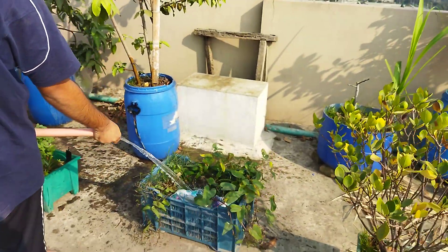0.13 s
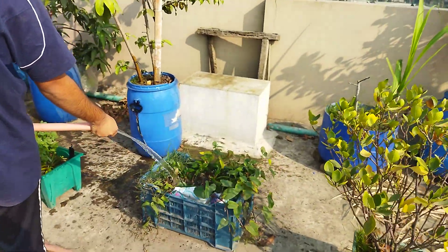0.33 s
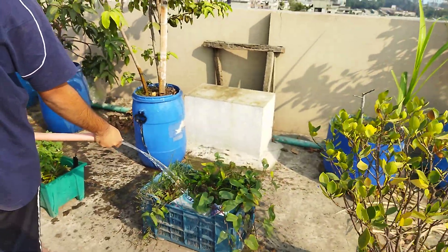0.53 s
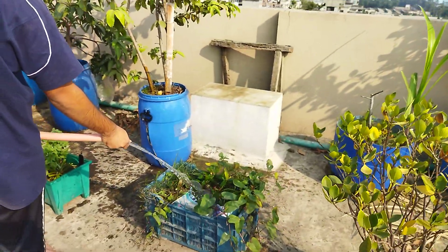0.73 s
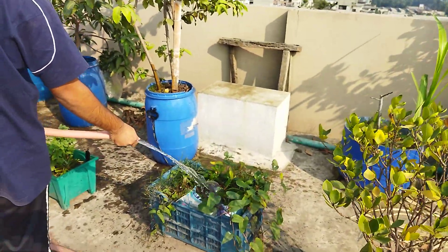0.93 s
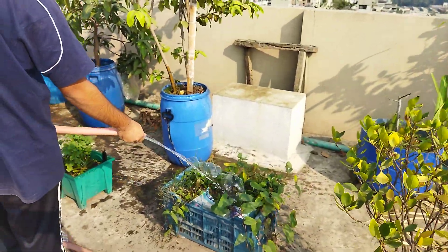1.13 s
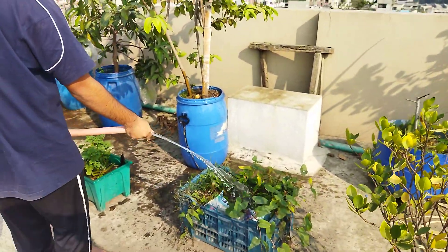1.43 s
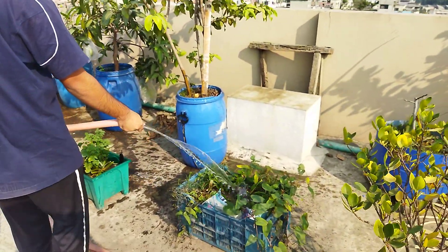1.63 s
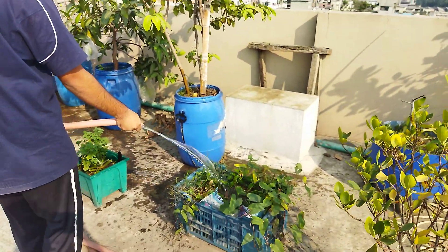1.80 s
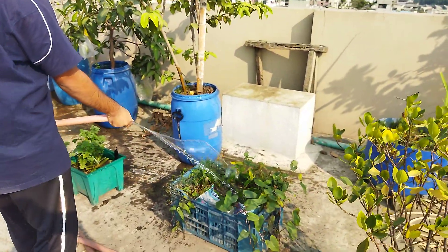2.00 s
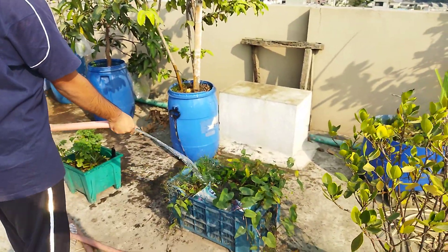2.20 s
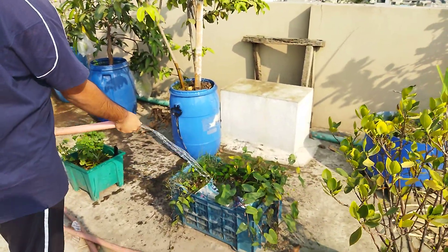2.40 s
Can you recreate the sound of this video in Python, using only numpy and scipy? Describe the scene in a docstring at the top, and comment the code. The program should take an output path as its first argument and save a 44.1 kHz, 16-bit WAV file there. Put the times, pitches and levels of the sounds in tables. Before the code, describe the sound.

A hose stream splatters on soaked soil and ticks on leaves outdoors, growing slightly stronger halfway, with small puddle plops and a late sharp drip. Wind thumps unevenly on the nearby microphone over faint foot scuffs and distant town noise.

```python
"""Water from a garden hose pours into a crate of leafy plants on a roof terrace.
Droplets tick and slap on the leaves, the stream splatters on wet soil, bubbles ring in a puddle,
and one heavy drop smacks the floor. Feet scuff on concrete; the parapet walls answer briefly.
Wind eddies hit the two microphone ports separately, over a faint wash of town noise."""
import sys
import numpy as np
from scipy import signal
from scipy.fft import rfft, irfft, next_fast_len
from scipy.io import wavfile
from scipy.ndimage import uniform_filter1d, map_coordinates

SR = 44100
rng = np.random.default_rng(int(sys.argv[2]) if len(sys.argv) > 2 else 0)


def store_pcm(level_fs):
    """Save levels as 16-bit WAV."""
    pcm = np.round(np.clip(level_fs, -1, 1) * 32767).astype(np.int16)
    wavfile.write(sys.argv[1], SR, np.atleast_2d(pcm).T)


N = 112454
PORT_LAG_S, WALL_DB, WALL_T60_S = 0.00008, 2.5, 0.14


# start_s, level_db
SPRAY_LEVEL = [(0, -51), (.2, -51), (.38, -51.5), (.62, -52.5), (1.0, -52.5), (1.17, -51), (1.28, -49.5),
               (1.42, -48), (1.62, -51), (1.73, -47), (1.82, -52), (1.86, -47.5), (2.14, -49.5),
               (2.24, -52.5), (2.55, -50.5)]
# freq_hz, gain_db
LEAF_SPECTRUM = [(1000, -6), (4400, 1.5), (5200, -1), (6700, -4.5), (7500, -7), (9700, -0.5), (11300, -4.5),
                 (11900, 2), (15800, -4.5)]
def spray(gain_db=4, mist_db=1.5):
    """Droplets tick on the leaves in uneven clumps over a fine mist."""
    ticks = impacts(per_s=3600, spread_db=3.1) * amp(2.9 * wobble(170))
    ticks = unit(terrace(ticks, lag_s=PORT_LAG_S))
    mist = amp(mist_db) * rng.standard_normal((2, N))
    return unit(coloured(ticks + mist, LEAF_SPECTRUM)) * amp(curve(SPRAY_LEVEL) + gain_db)


# start_s, level_db
LEAF_SLAPS = [(0.064, -31), (0.273, -22), (.776, -32), (1.160, -29), (1.401, -17.5), (1.537, -21.5),
              (1.838, -28), (1.85, -20), (1.977, -22), (2.088, -20), (2.128, -21), (2.196, -24),
              (2.265, -26), (2.489, -26), (2.507, -17.5)]
# freq_hz, gain_db
SLAP_SPECTRUM = [(1500, -13), (4000, -4), (7500, -14), (10000, -3.5), (12500, 2.5), (15500, 1)]
def slaps(gain_db=-10):
    """Big drops burst on near leaves, each a short, bright splash."""
    envelope = sum(amp(db + gain_db) * decay(s, t60_s=0.012) for s, db in LEAF_SLAPS)
    bursts = coloured(envelope * rng.standard_normal(N), SLAP_SPECTRUM)
    return terrace(bursts, wall_db=-2, lag_s=PORT_LAG_S)


# start_s, level_db
STREAM_LEVEL = [(0, -43.5), (.11, -47), (.33, -45.5), (.55, -43.5), (.63, -44.5), (.86, -42.5), (1.08, -44),
                (1.25, -40), (1.5, -41), (1.75, -40.5), (2.15, -40.5), (2.3, -41.5), (2.55, -40)]
# centre_s, sigma_s, level_db
STREAM_SURGES = [(0.058, 0.0032, -41.5), (1.595, 0.016, -39.5), (1.727, 0.027, -37.5), (1.885, .012, -37.5),
                 (2.106, 0.011, -40)]
# freq_hz, gain_db
SOIL_SPECTRUM = [(400, -13.5), (1200, -10.5), (1900, -1.5), (2500, 4.5), (3100, 1), (3700, -1),
                 (4600, -4.5), (5400, -10.5), (8000, -21)]
def stream(splat_db=-3, wash_db=1.5, fizz_db=-6):
    """The stream breaks into splats and small bubbles on soaked soil, surging now and then."""
    splats = terrace(impacts(per_s=1100, spread_db=4))
    wash = amp(wash_db) * rng.standard_normal((2, N))
    splatter = unit(coloured(splats + wash, SOIL_SPECTRUM))
    fizz = terrace(bubbles(per_s=300, pitch_hz=2965, t60_cycles=21, scatter=0.13, rise=0.15))
    base_flow = amp(curve(STREAM_LEVEL) + 1.4 * wobble(140))
    surge_power = sum((amp(db) * swell(s, sigma_s)) ** 2 for s, sigma_s, db in STREAM_SURGES)
    flow = np.sqrt(base_flow ** 2 + surge_power)
    return flow * (amp(splat_db) * splatter + amp(fizz_db) * fizz)


# start_s, level_db
POOL_LEVEL = [(0, -57), (.05, -46), (.15, -60), (.5, -58), (.6, -51), (.71, -47.5), (.77, -56), (.84, -45),
              (.95, -52.5), (1.05, -48), (1.12, -52), (1.28, -52), (1.5, -53), (2.55, -59)]
def pool():
    """Bubbles of nearly one size ring where the stream digs into standing water."""
    rings = bubbles(per_s=420, pitch_hz=3030, t60_cycles=32, scatter=0.065, rise=0.027)
    return amp(curve(POOL_LEVEL)) * terrace(rings)


# start_s, pitch_hz, level_db
PUDDLE_PLOPS = [(1.429, 2500, -28), (1.593, 2640, -23.5), (1.738, 2600, -31), (1.8688, 2760, -16.5),
                (2.017, 2930, -32)]
def plops():
    """Larger air pockets ring in the puddle."""
    rings = sum(amp(db) * ping(s, hz, attack_s=0.002, t60_s=0.011) for s, hz, db in PUDDLE_PLOPS)
    return terrace(rings, wall_db=-7)


# freq_hz, gain_db
DROP_SPECTRUM = [(250, -20), (700, 0), (1500, 0), (2600, -1), (4200, -9), (5000, -23), (9000, -45)]
def heavy_drop(start_s=2.3806, bubble_hz=2500, rise_hz_per_s=70000):
    """One heavy drop smacks the wet floor, splatters and traps a bubble that rises in pitch."""
    t = clock() - start_s
    smack = amp(-3.5) * coloured(signal.unit_impulse(N, round(start_s * SR)), DROP_SPECTRUM)
    noise = unit(coloured(rng.standard_normal(N), DROP_SPECTRUM))
    splatter = amp(-35.5) * decay(start_s, t60_s=0.035) * noise
    chirp = np.sin(2 * np.pi * t * (bubble_hz + rise_hz_per_s * t / 2))
    bubble = amp(-31) * decay(start_s, t60_s=0.03) * chirp
    return terrace(smack + splatter + bubble, wall_db=-12)


# centre_s, sigma_s, level_db, resonance_hz, q, grit_db
SHOE_SCUFFS = [(0.188, .02, -39.5, 2280, 2.6, -11), (0.409, 0.014, -38.5, 2320, 4.3, 0.5),
               (0.452, 0.015, -38.5, 2180, 4.3, -5), (0.904, 0.013, -44, 2030, 2.5, -13),
               (1.146, 0.025, -33.5, 2565, 12, 2.5), (2.09, .008, -44, 1770, 2, -1)]
# freq_hz, gain_db
GRIT_SPECTRUM = [(300, -12), (900, -5.5), (2200, 1.5), (4400, 2.5), (5300, -9.5), (9000, -15), (15000, -29)]
def feet():
    """Soles drag over gritty concrete with a hollow rasp."""
    grit = unit(coloured(impacts(per_s=5000, spread_db=2), GRIT_SPECTRUM))
    out = np.zeros((2, N))
    for s, sigma_s, db, hz, q, grit_db in SHOE_SCUFFS:
        hollow = signal.iirpeak(hz, q, SR)
        noise = rng.standard_normal((2, N))
        rasp = unit(signal.lfilter(*hollow, signal.lfilter(*hollow, noise)))
        crunch = amp(grit_db) * terrace(grit, wall_db=0.5)
        out += amp(db) * swell(s, sigma_s) * unit(rasp + crunch)
    return out


# start_s, level_db, pitch_hz, port
WIND_POPS = [(0.3299, 0, 316, "L"), (0.5128, 0.5, 284, "L"), (0.69, -6.5, 165, "R"), (1.6636, -8, 253, "L")]
def wind_pops(side):
    """Sharp pressure pops of the wind on one port."""
    pops = sum(amp(db) * ping(s, hz, attack_s=0.0026, t60_s=0.014)
               for s, db, hz, port in WIND_POPS if port == side)
    return coloured(pops, [(30, -23), (120, 5.5), (600, -2), (1200, 1), (2500, -39)])


# start_s, left_db, right_db
BREEZE_LEVEL = [(0, -40.5, -34.5), (.17, -37, -39), (0.361, -37, -35), (.7, -33, -34), (1.0, -38, -38.5),
                (1.35, -38, -37), (1.6, -43.5, -38.5), (1.9, -45.5, -33.5), (2.25, -36.5, -34),
                (2.42, -43.5, -40.5), (2.55, -42.5, -38)]
# centre_s, sigma_s, level_db, roughness_db, port
WIND_EDDIES = [(0.223, 0.0046, -23, -0.5, "L"), (0.34, 0.0088, -17.5, -1.5, "L"),
               (0.502, 0.0078, -17, -8, "L"), (0.516, 0.0036, -15.5, -3.5, "L"),
               (0.527, 0.0064, -16.5, -5, "L"), (0.544, 0.0055, -13, -16, "L"),
               (.552, 0.0024, -18.5, 5, "L"), (.561, 0.0034, -15, 0.5, "L"), (0.632, 0.028, -29, -6, "L"),
               (0.798, 0.009, -15.5, -16, "L"), (0.806, 0.003, -17.5, 0.5, "L"),
               (0.825, 0.0054, -19, -4, "L"), (0.958, 0.005, -26, 2, "L"), (1.077, 0.007, -16, -1, "L"),
               (1.092, 0.011, -18.5, -4.5, "L"), (1.135, 0.0034, -23, 4, "L"),
               (1.539, 0.011, -24, -17, "L"), (1.759, 0.0046, -25, -10, "L"),
               (2.069, 0.011, -23.5, 4.5, "L"), (2.126, 0.012, -18.5, -1.5, "L"),
               (2.153, 0.0055, -20, 5.5, "L"), (0.329, 0.017, -25, 1.5, "R"), (0.383, 0.01, -20, 5, "R"),
               (0.431, 0.016, -24.5, 0.5, "R"), (0.623, 0.022, -29, -7, "R"),
               (0.796, 0.011, -25, -2.5, "R"), (0.911, 0.0086, -25.5, -9, "R"),
               (1.216, 0.0054, -26, -3, "R"), (1.258, 0.0045, -23, -16, "R"), (1.341, 0.015, -25, -5, "R"),
               (1.44, 0.0068, -27.5, -7, "R"), (1.527, 0.0041, -21.5, -7, "R"),
               (1.606, 0.0052, -26, -20, "R"), (1.665, 0.0092, -24.5, -2, "R"),
               (1.793, 0.012, -24, -1, "R"), (1.857, 0.0058, -26, -7, "R"), (1.975, 0.0062, -22.5, 6, "R"),
               (1.98, 0.023, -24.5, -5, "R"), (2.299, 0.0061, -19.5, -2.5, "R")]
# freq_hz, gain_db
BUFFET_SPECTRUM = [(20, -40), (40, -24), (65, -9.5), (130, 4), (200, -2.5), (300, -8.5), (450, -22),
                   (700, -45.5), (1400, -60.5)]
# freq_hz, gain_db
FLUTTER_SPECTRUM = [(60, -32), (160, -4.5), (290, -1.5), (460, -4), (660, -18), (1000, -30.5), (1500, -59)]
# freq_hz, gain_db
MIC_BASS_CUT = [(15, -39), (30, -18), (45, -12), (65, 1.5), (110, 2), (200, 1)]
def wind(side, swing_db=3, breeze_roughness_db=-4, flutter_exponent=1.57):
    """Breeze, eddies and pops buffet one port; stronger eddies flutter more brightly."""
    breeze_db = curve([(s, left if side == "L" else right) for s, left, right in BREEZE_LEVEL])
    breeze = amp(breeze_db + swing_db * wobble(39.81))
    eddies = [(amp(db) * swell(s, sigma_s), amp(roughness_db))
              for s, sigma_s, db, roughness_db, port in WIND_EDDIES if port == side]
    force = np.sqrt(breeze ** 2 + sum(push ** 2 for push, _ in eddies))
    rough_power = sum((push * rough) ** 2 for push, rough in eddies)
    roughness = np.sqrt((amp(breeze_roughness_db) * breeze) ** 2 + rough_power)
    flutter = 0.097 * (10 * roughness) ** flutter_exponent * amp(-10 + 2.2 * wobble(110))
    pressure = force * turbulence(BUFFET_SPECTRUM) + flutter * turbulence(FLUTTER_SPECTRUM)
    return coloured(pressure + wind_pops(side), MIC_BASS_CUT)


# freq_hz, gain_db
TOWN_SPECTRUM = [(100, -5), (600, -5.5), (1300, -2.5), (2000, -2.5), (4000, -26), (8000, -40)]
def town(level_db=-55.5):
    """A faint, even wash from the streets below."""
    return amp(level_db) * unit(coloured(rng.standard_normal((2, N)), TOWN_SPECTRUM))


def impacts(per_s, spread_db):
    """Random tiny impacts, mostly weak, a few strong; rms 1."""
    size = amp(spread_db * np.minimum(rng.exponential(size=N), 4))
    hits = rng.random(N) < per_s / SR
    return unit(hits * size * rng.standard_normal(N))


def bubbles(per_s, pitch_hz, t60_cycles, scatter, rise, spread_db=3.5):
    """Trapped air rings briefly and rises in pitch; rms 1."""
    when, size, pitch = rng.random((int(per_s * N / SR), 3)).T
    t = np.arange(SR // 40) / SR
    hz = pitch_hz * np.exp(scatter * np.log(pitch / (1 - pitch)) / 2)[:, None]
    age = hz * t / t60_cycles
    strength = amp(-spread_db * np.log(np.maximum(size, 0.03)))[:, None]
    rings = strength * amp(-60 * age) * np.sin(2 * np.pi * hz * t * (1 + rise * age))
    samples = (when * N).astype(int)[:, None] + np.arange(len(t))
    return unit(np.bincount(samples.ravel(), rings.ravel(), N)[:N])


def turbulence(spectrum):
    """Pressure noise of even strength; rms 1."""
    noise = coloured(rng.standard_normal(N), spectrum)
    power = uniform_filter1d(np.abs(signal.hilbert(noise)) ** 2, size=450)
    return unit(noise / np.sqrt(np.abs(power) + 1e-12))


def terrace(x, wall_db=WALL_DB, lag_s=0):
    """Direct sound, lag_s later at the right port, plus short scatter from floor and walls."""
    t = np.arange(SR // 8) / SR
    envelope = amp(-60 * t / WALL_T60_S) + 4 * amp(-60 * t / 0.0079)
    tail = rng.standard_normal((2, len(t))) * envelope
    wet = signal.oaconvolve(x[None], tail / np.linalg.norm(tail[0]), axes=1)[:, :N]
    direct = np.array([x, np.roll(x, round(lag_s * SR))])
    return (direct + amp(wall_db) * wet) / np.hypot(1, amp(wall_db))


def coloured(x, spectrum):
    """Minimum-phase filter through (freq_hz, gain_db) points."""
    m = 16384
    hz, db = np.transpose(spectrum)
    gain = amp(np.interp(np.log(np.fft.rfftfreq(m, 1 / SR) + 1), np.log(hz), db))
    cepstrum = irfft(np.log(gain))
    cepstrum[1:m // 2] *= 2
    cepstrum[m // 2 + 1:] = 0
    response = irfft(np.exp(rfft(cepstrum)))[:m // 2]
    size = next_fast_len(N + m // 2, real=True)
    return irfft(rfft(x, size) * rfft(response, size), size)[..., :N]


def ping(start_s, hz, attack_s, t60_s):
    """Damped sine with a soft onset."""
    envelope = decay(start_s, t60_s) - decay(start_s, attack_s)
    return envelope * np.sin(2 * np.pi * hz * (clock() - start_s))


def decay(start_s, t60_s):
    """Sudden onset, exponential fall."""
    out, start = np.zeros(N), round(start_s * SR)
    t = np.arange(min(N - start, SR // 10)) / SR
    out[start:start + len(t)] = amp(-60 * t / t60_s)
    return out


def swell(centre_s, sigma_s):
    """Gaussian rise and fall."""
    out, centre = np.zeros(N), round(centre_s * SR)
    near = np.arange(max(0, centre - SR // 10), min(N, centre + SR // 10))
    out[near] = np.exp(-0.5 * ((near / SR - centre_s) / sigma_s) ** 2)
    return out


def wobble(knots_per_s):
    """Smooth random curve."""
    knots = rng.standard_normal(int(N * knots_per_s / SR) + 4)
    return map_coordinates(knots, [clock() * knots_per_s])


def curve(rows):
    """Straight lines through (start_s, value) rows."""
    return np.interp(clock(), *np.transpose(rows))


def clock():
    """Sample times in seconds."""
    return np.arange(N) / SR


def amp(db):
    """Decibels to gain."""
    return 10 ** (np.asarray(db) / 20)


def unit(x):
    """Scale to rms 1."""
    return x / np.sqrt(np.mean(x ** 2) + 1e-20)


# freq_hz, gain_db
LEFT_PORT_RESPONSE = [(600, 2.5), (1500, -2.5), (2600, -9.5), (4200, -3), (7500, 1.5), (12000, 0.5),
                      (15000, 5.5)]
# freq_hz, gain_db
RIGHT_PORT_RESPONSE = [(600, 0), (1500, 0.5), (2600, 0), (4200, -1.5), (5000, -4), (6700, 1), (7400, -11.5),
                       (8600, -4), (9900, 2), (12000, 3), (15000, 2)]
def scene():
    """Water, feet and town as each port hears them, plus its own wind."""
    left, right = spray() + slaps() + stream() + pool() + plops() + heavy_drop() + feet() + town()
    return np.array([coloured(left, LEFT_PORT_RESPONSE) + wind("L"),
                     coloured(right, RIGHT_PORT_RESPONSE) + wind("R")])


def record(dry):
    """Brick-wall low-pass at the band limit."""
    top_hz, size = 15850, 2 * next_fast_len(N)
    passband = np.fft.rfftfreq(size, 1 / SR) < top_hz
    return irfft(rfft(dry, size) * passband, size)[:, :N]


dry = scene()
out = record(dry)
store_pcm(out)
```